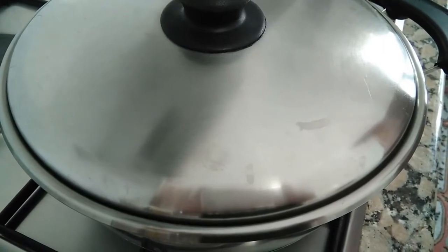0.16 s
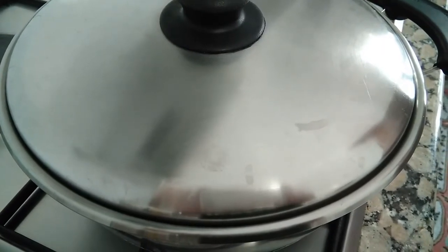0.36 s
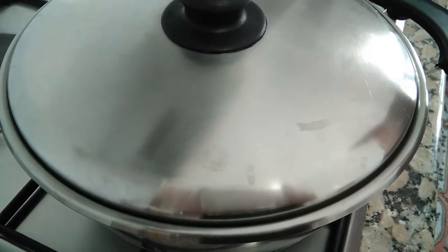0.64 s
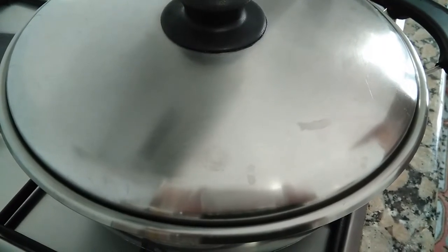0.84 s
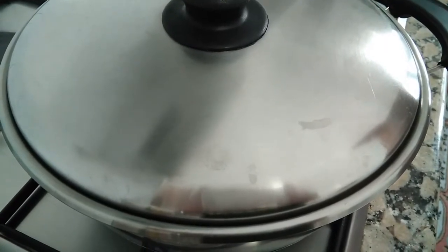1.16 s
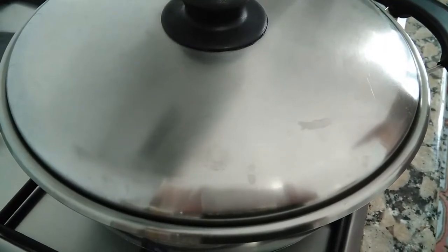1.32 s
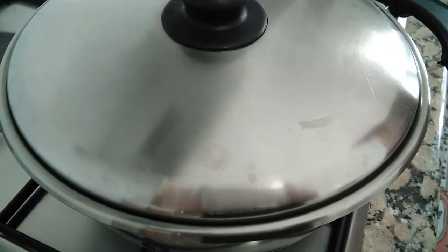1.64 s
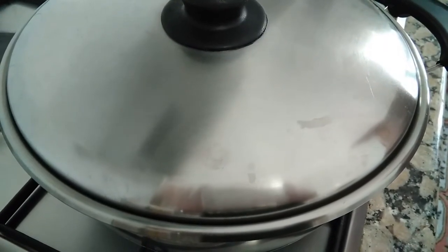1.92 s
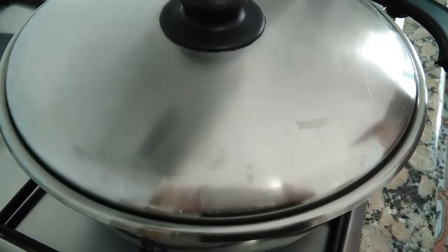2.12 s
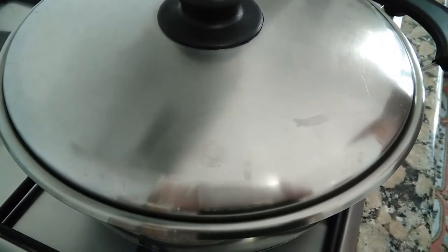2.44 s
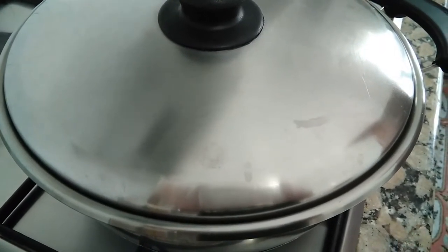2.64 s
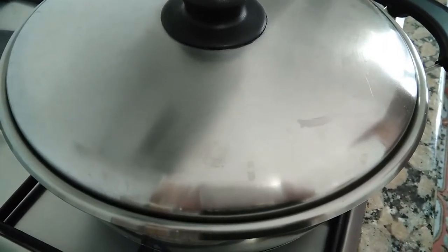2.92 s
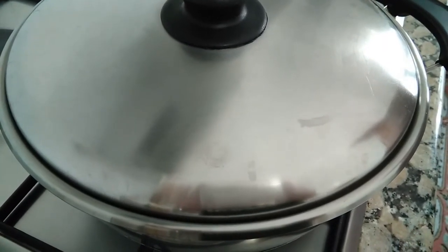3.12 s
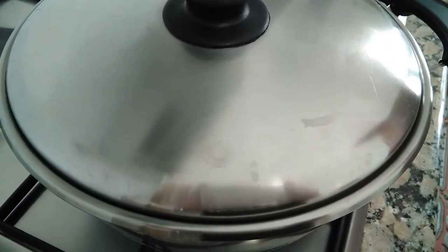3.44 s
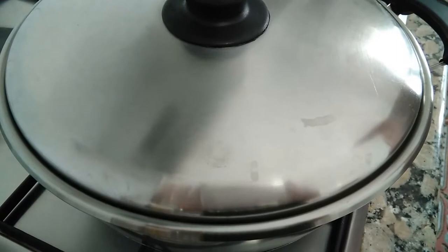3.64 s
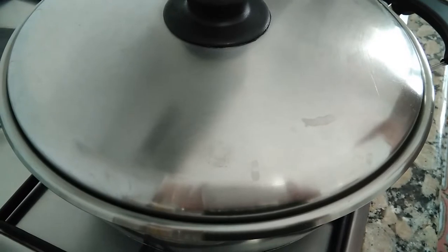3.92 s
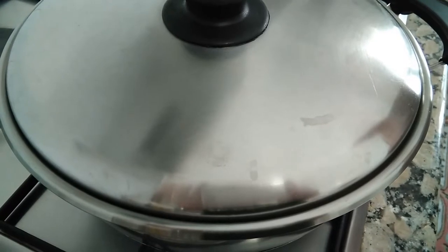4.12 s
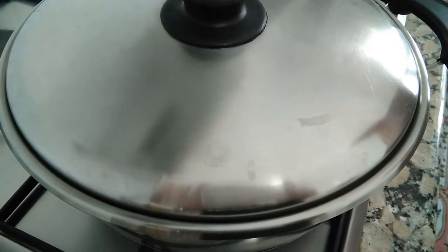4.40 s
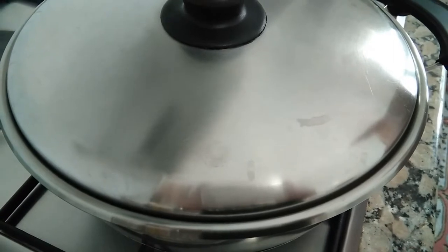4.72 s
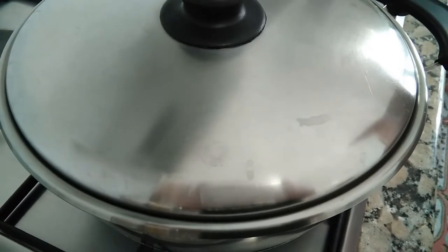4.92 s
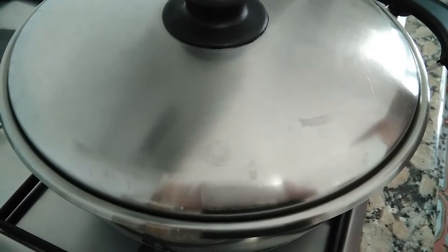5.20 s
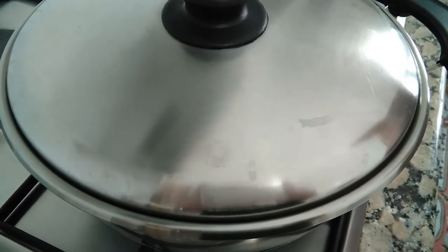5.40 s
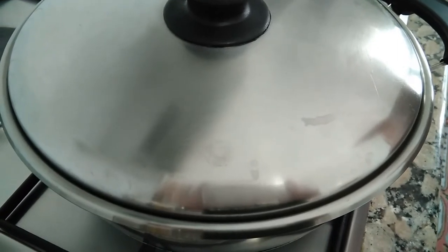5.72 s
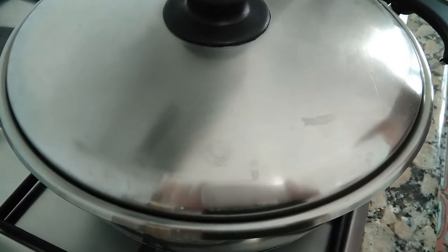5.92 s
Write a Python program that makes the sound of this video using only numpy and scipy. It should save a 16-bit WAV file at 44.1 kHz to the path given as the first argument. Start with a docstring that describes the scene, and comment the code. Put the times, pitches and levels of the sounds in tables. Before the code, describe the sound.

Popcorn bursts inside a lidded steel pot, heard close in stereo in a small hard-walled kitchen. A soft gas-flame rush with a thin, fluttering high hiss and very faint ticks of hot oil runs throughout. At 0-0.2 s a tight cluster snaps and knocks, then scattered pops follow until 1.1 s. After a gap, a crackling run fills 1.5-2.2 s with hollow steel knocks and a steam spit. Sparser pops lead to a ringing clatter near 2.9 s. From 3.2 to 4.0 s popping is steadier, with steam spurts leaning left. After a short pause, the densest, sharpest flurry comes at 4.4-4.9 s, snaps and knocks overlapping. More bursts ring the lid at 5.0-5.5 s, then a lull, and faint pops close near 5.9-6 s. Low thumps and brief room reverberation accompany them.

```python
"""Popcorn bursts in a lidded steel pot on a gas stove, close by in a small hard kitchen.
Each burst sums shaped noise (hull crack, steam, hollow body) with a low push of air and ringing steel modes.
Flying kernels knock on the wall and lid: brief noise excites the cavity, and decaying modes ring on.
Short steam spurts and faint ticks of hot oil are filtered noise and impulses.
The burner hisses underneath as coloured noise, and a decaying noise tail gives the reverberation."""
import sys
import numpy as np
from scipy import signal
from scipy.fft import rfft, irfft, next_fast_len
from scipy.io import wavfile
from scipy.ndimage import uniform_filter1d, map_coordinates

SR = 44100
rng = np.random.default_rng(int(sys.argv[2]) if len(sys.argv) > 2 else 0)


def to_wav(s):
    """Save 16-bit WAV."""
    ch = np.atleast_2d(s).T  # columns
    pcm = np.round(np.clip(ch, -1, 1) * 32767)  # PCM
    wavfile.write(sys.argv[1], SR, pcm.astype(np.int16))


N = 267246

# bursting kernels: [t/s, hollow body level/dB, steam level/dB, hull crackle level/dB, first snap peak/dB,
# thump level/dB, rise/s, spit t60/s, spit f/Hz, steam left-right level/dB]
KERNEL_BURSTS = [(0.06, -30, -23, -40, -26, -23, 0.0017, 0.06, 4460.0, -2.5),
                 (0.068, -27.5, -15.5, -40.0, -14, -35, 0.00066, 0.11, 7350, -2.5),
                 (0.114, -23.5, -24, -23.5, -5, -12, 0.0036, 0.13, 3080.0, 1.0),
                 (0.166, -51, -40, -48, -33, -33, 0.0018, 0.05, 2710.0, 6),
                 (0.392, -40, -22.0, -22.5, -27, -22.5, 0.0006, 0.077, 4420, -2.5),
                 (0.503, -37, -26, -27, -11, -28.5, 0.0021, 0.081, 8270.0, -1.0),
                 (0.561, -33.5, -33, -36.0, -26, -33, 0.00085, 0.09, 2780.0, 1),
                 (0.627, -28.0, -22, -22, -24, -30, 0.0026, 0.048, 7170.0, -1),
                 (0.846, -25.5, -18, -20, -21, -21, 0.00071, 0.11, 5560, -0.0),
                 (0.907, -43, -26, -28, -25, -18, 0.0007, 0.047, 8420.0, 6),
                 (0.927, -28.5, -26.0, -39.0, -9.5, -36, 0.00028, 0.016, 7800, -3),
                 (1.093, -48, -40.5, -53.0, -24.5, -24.5, 0.0005, 0.04, 5380.0, 1),
                 (1.489, -41, -34.5, -38, -25, -31, 0.0028, 0.074, 6650.0, -3.5),
                 (1.559, -37, -29.5, -36.5, -32.0, -30, 0.0046, 0.34, 7000, 0.5),
                 (1.621, -44, -31, -30, -38.0, -42, 0.009, 0.13, 3230, -4),
                 (1.63, -47, -36, -30, -28.0, -35, 0.0034, 0.06, 6780.0, 1.0),
                 (1.638, -30, -20.5, -21, -21.0, -42.0, 0.0012, 0.041, 6840, 4),
                 (1.738, -24, -21, -31, -10, -17, 0.00065, 0.054, 5300, 3),
                 (1.911, -34.5, -35.5, -29.5, -23, -23, 0.0021, 0.22, 2710.0, 2),
                 (2.103, -40, -33.5, -37.0, -28.0, -32, 0.0011, 0.1, 4310.0, 2),
                 (2.117, -26.5, -25.5, -25.5, -11, -37, 0.0014, 0.056, 2700, -0.5),
                 (2.238, -39, -34, -35, -27.5, -30.5, 0.00088, 0.072, 3670, -1),
                 (2.559, -33, -29.5, -17, -10.0, -26.5, 0.0012, 0.042, 7200, 6),
                 (2.834, -38, -32, -23.5, -22, -36, 0.0013, 0.077, 8480.0, -2),
                 (2.876, -33.0, -34, -36.0, -24.0, -38, 0.0014, 0.041, 2710.0, 3),
                 (2.885, -31, -39, -33, -16, -31, 0.00089, 0.04, 2710.0, 2),
                 (2.908, -31, -26, -27, -24, -40.0, 0.0034, 0.1, 8180.0, 5),
                 (3.224, -31.5, -34.5, -47, -26, -20.5, 0.00079, 0.12, 4840.0, 0.0),
                 (3.264, -28.0, -29.5, -23.5, -21, -31.5, 0.0013, 0.067, 4700, -1.5),
                 (3.366, -48.0, -50.0, -44, -34, -28.5, 0.002, 0.05, 5020.0, 2),
                 (3.475, -26.5, -23.5, -24, -8.5, -21.5, 0.0016, 0.072, 4640, 3),
                 (3.606, -47, -28.0, -43, -12, -32, 0.0013, 0.04, 6160.0, 0.0),
                 (3.691, -32.0, -19, -20.5, -26.0, -37, 0.0012, 0.091, 5800, 1),
                 (3.714, -34, -32, -21.5, -22.0, -28, 0.0029, 0.18, 7620.0, 2),
                 (3.759, -36, -39, -48.0, -36.0, -26, 0.0023, 0.11, 5040.0, -2),
                 (3.831, -27.5, -23.5, -29, -24.0, -29, 0.00023, 0.016, 5930, -1),
                 (3.898, -33, -26.5, -15.5, -21, -18.5, 0.00024, 0.076, 6180.0, 4),
                 (4.018, -30.0, -26.0, -34, -28, -21, 0.0014, 0.042, 5450.0, 2.5),
                 (4.442, -28.5, -29.5, -36, -25, -25.0, 0.00082, 0.031, 3900, 0),
                 (4.492, -29, -18.5, -24.0, 3.5, -43, 0.00096, 0.063, 7340, 2),
                 (4.505, -26.5, -28, -31.0, -22.0, -26, 0.0017, 0.081, 6960.0, 2),
                 (4.525, -42, -25, -25.0, -19.0, -18.5, 0.0029, 0.12, 4060, -0.5),
                 (4.643, -34, -25, -30.0, -22, -33, 0.001, 0.033, 4570.0, 2),
                 (4.651, -29, -22, -23.0, -3.5, -33, 0.00067, 0.0088, 4650, -3),
                 (4.667, -31.5, -46, -27, -28.0, -23, 0.0025, 0.097, 2710.0, -1.0),
                 (4.722, -33, -36, -31, -23, -18, 0.0015, 0.062, 2710.0, 2),
                 (4.739, -23, -21.5, -23.5, -15, -17, 0.0029, 0.096, 2680, 2),
                 (4.843, -34.5, -33.0, -38, -19.0, -25.0, 0.001, 0.21, 2710.0, 4.5),
                 (5.037, -29, -23.0, -18.0, -18.0, -29, 0.0012, 0.043, 4800, -1),
                 (5.065, -33, -27, -32, -14, -43, 0.0012, 0.05, 2710.0, 7),
                 (5.087, -30, -24.0, -21, -19.0, -38, 0.0023, 0.24, 5060.0, 2.5),
                 (5.115, -40, -31, -24.5, -16, -25, 0.0037, 0.12, 5300, 5),
                 (5.249, -33, -25, -30.5, -19, -34, 0.0018, 0.15, 7350, 1),
                 (5.334, -38.0, -31.5, -26, -4, -35, 0.0013, 0.0087, 6310.0, 4),
                 (5.386, -34.5, -29.5, -29, -17.0, -22, 0.0025, 0.13, 5600, 0),
                 (5.43, -48, -48, -38, -27.0, -43, 0.002, 0.081, 5120.0, 0.5),
                 (5.492, -35.5, -33.5, -35, -32.0, -28, 0.0009, 0.073, 4050, 0),
                 (5.913, -35, -35.5, -36, -35, -32.0, 0.0016, 0.037, 5040.0, -1.5),
                 (5.933, -41, -39.5, -35, -21, -40, 0.0019, 0.12, 4820.0, -0.0),
                 (5.991, -39, -38.5, -46, -27.0, -23, 0.00072, 0.27, 2710.0, -3)]
# kernels striking the steel: [t/s, knock level/dB, bright clack level/dB, ring level/dB, lid level/dB,
# struck spot f/Hz]
KERNEL_KNOCKS = [(.001, -30, -22.5, -35, -31, 1510), (0.047, -31, -32, -41, -45, 1830),
                 (.122, -23, -39, -53, -51, 540), (.134, -20.5, -32, -55, -39, 2300),
                 (.652, -22, -52, -71, -41, 1030), (.857, -29.5, -30, -43, -51, 1040),
                 (0.99, -36.5, -36, -48.5, -58, 1880), (1.118, -34, -47, -59, -60, 2320),
                 (1.616, -27, -25.5, -49, -49, 2230), (1.655, -25, -50, -46, -28, 1610),
                 (1.673, -24, -17.5, -43, -52, 1050), (1.752, -23, -54, -62, -59, 1110),
                 (1.935, -22, -33.5, -49, -36, 890), (2.173, -32.5, -61, -68, -37, 1090),
                 (2.331, -43, -60, -76, -54, 2100), (2.853, -31, -33, -44, -38, 1540),
                 (2.886, -22.5, -20.5, -48, -52, 2200), (2.899, -22, -24, -32, -30, 1510),
                 (3.241, -30, -35, -51, -24.5, 1690), (3.281, -22, -37, -66, -29, 1550),
                 (3.503, -19.5, -17, -32.5, -30.5, 1600), (3.724, -27, -41, -50, -57, 880),
                 (3.868, -30.5, -51, -51, -34, 1510), (3.914, -29, -29.5, -45, -39, 1520),
                 (4.053, -27.5, -59, -70, -58, 1000), (4.470, -25, -40, -50, -35, 1440),
                 (4.522, -25, -27, -37, -46, 1500), (4.542, -23.5, -26.5, -42, -33.5, 1530),
                 (4.681, -18.5, -25.5, -61, -54, 2160), (4.723, -27, -49, -37.5, -52, 500),
                 (4.747, -23, -50, -58, -57, 430), (4.757, -16, -45, -56, -28, 1400),
                 (4.766, -23.5, -24.5, -48, -28.5, 1660), (4.861, -35, -46, -61, -45, 1300),
                 (5.054, -20.5, -24, -46, -22.5, 1620), (5.273, -24, -54, -44, -23.5, 990),
                 (5.286, -29.5, -41, -49, -29, 1630), (5.369, -30.5, -40, -48, -36, 1640),
                 (5.426, -26, -53, -54, -57, 900), (5.524, -27.5, -51, -53, -34.5, 1160)]
# short spurts of steam: [t/s, level/dB, centre f/Hz]
STEAM_SPURTS = [(0.321, -47, 7260), (.522, -27.5, 5050), (1.470, -44.5, 8660), (1.582, -26, 5400),
                (2.074, -38.5, 5300), (3.471, -24, 4950), (3.650, -32.5, 6500), (3.681, -27.5, 5430),
                (3.82, -30, 5030), (4.626, -31, 5900), (5.266, -28.5, 5330), (5.310, -40, 7500),
                (5.480, -35, 5170)]
# modes of the pot's wall: [f/Hz, level/dB, t60/s]
WALL_MODES = [(899, -3, .4), (1044, -4, .4), (1112, -9, .4), (1184, -6, .4), (1394, -7, .6), (1542, -6, .4),
              (1647, 1, .7), (1941, -3, .5), (2159, -5, .5), (2238, -4, .6), (2498, -8, .6), (2853, -8, .5),
              (3181, -6, .6), (3350, -7, .55), (3520, -9, .4), (3650, -9, .4), (3849, 1, .5),
              (4116, -2, .45), (4312, -3, .85), (4341, -4, .5), (4486, -6, .45), (4661, -6, .4),
              (4849, -4, .7), (5076, -9, .4), (5380, -1, .6), (5609, -10, .4), (5969, -4, .6),
              (6062, -12, .5), (6557, -8, .6), (6912, -8, .35), (7203, -9, .55), (7822, -9, .45),
              (8207, -4, .38), (8479, -13, .35), (8929, -10, .33), (9664, -14, .4), (10422, -17, .42)]
# modes of the lid, around one main note: [f/Hz, level/dB, t60/s]
LID_MODES = [(897, -9, .35), (1041, -13, .35), (1181, -11, .5), (1509, -9, .3), (1659, -3, .52),
             (1667, -11, .35), (4848, -17, .45), (5968, -15, .55)]
# broad resonances of the covered pot: [f/Hz, width/Hz, level/dB]
CAVITY_RESONANCES = [(537, 100, -12), (740, 97, -6), (924.5, 59, 5), (1079, 34.7, 6), (1145, 58, -1),
                     (1489, 101, -5), (1698, 102, -7.5), (1828, 47, 0), (2148, 139, -0.5), (2900, 520, -11)]
# low modes of the kitchen in which a thump sways on: [f/Hz, level/dB, t60/s]
ROOM_MODES = [(73, -21, .3), (101.7, -16, 0.29), (117.7, -9.5, 0.34), (160, -22, .2), (209, -22.5, 0.33),
              (279, -28, .2), (297, -30, 0.17)]
# spectrum of the spitting steam: [f/Hz, level/dB]
STEAM_SPECTRUM = [(250, -22), (700, -23), (2000, -10.5), (3000, 0), (4200, 3), (5500, 5), (7400, 1),
                  (8800, -8.5), (11500, -24), (16000, -65)]
# spectrum of the cracking hull: [f/Hz, level/dB]
CRACK_SPECTRUM = [(300, -25), (1500, -11), (5000, -27), (8500, 10.5), (11300, 5.5), (13300, 12.5),
                  (15700, 14)]
# spectrum of the bright clack on steel and of the oil ticks: [f/Hz, level/dB]
CLACK_SPECTRUM = [(250, -12), (900, -6.5), (2000, 7.5), (3000, 3), (4200, 5), (5500, 3), (7400, -1.5),
                  (8800, -17), (11500, -21), (16000, -31)]
# spectrum of the steam spurts: [f/Hz, level/dB]
SPURT_SPECTRUM = [(1000, -11.5), (3000, 2.5), (4300, 3), (5500, -4.5), (7400, -2), (8300, -13),
                  (9500, -11.5), (16000, -12)]
# spectrum of the flame's rush: [f/Hz, level/dB]
FLAME_SPECTRUM = [(25, -8), (60, -5), (125, 5), (300, -8.5), (600, -4.5), (1100, -13.5), (1800, -12),
                  (3000, -16), (4200, -14.5), (5800, -20), (6600, -15.5), (8000, -23.5), (16000, -16.5)]
# noisy whistle of the gas jet: [f/Hz, width/Hz, level/dB]
NOZZLE_RESONANCES = [(4710, 190, -7), (5180, 300, 4.5), (5310, 120, 2)]
# reverberation time of the kitchen: [f/Hz, t60/s]
ROOM_DECAY = [(150, 0.43), (500, 0.52), (1400, 0.57), (4000, 0.57), (8000, 0.56), (15000, 0.32)]
# stereo microphone, what both channels share: [f/Hz, level/dB]
MID_RESPONSE = [(60, -14.5), (140, -21.5), (280, -19), (500, -7.5), (800, -2.5), (1000, -0.5),
                (16000, -1.5)]
# stereo microphone, what sets the channels apart: [f/Hz, level/dB]
SIDE_RESPONSE = [(250, 1.5), (500, -0.5), (900, -2.5), (1050, 1), (2100, -3), (2400, 2), (2800, -1)]
# stereo microphone, balance: [f/Hz, left-right level/dB]
BALANCE = [(250, 0.5), (600, 1.5), (1100, -0.5), (2000, 1.5), (4000, -5), (7500, 7.5), (12000, 2),
           (16000, -2)]

RIPPLE_DB = 3.5  # colouring by a burst's place in the pot, dB rms
TOP_HZ = 15850  # upper band limit
LEFT_LAG_S = .00063  # delay of the bursts' left channel
POP_RING_DB = -29.5  # ring of the steel against the pop that wakes it
THUD_DB = -16  # thud of the pot's hollow against the push that wakes it
PUSH_HZ, PUSH_WIDTH_S, PUSH_PEAK_S = 119, 0.0039, 0.0072  # push of air: pitch, half width, time to its peak
RETURN_S, RETURN_DB = 0.032, -15  # the walls send the push back once
LINGER_DB, LINGER_T60_S = -11.5, 0.17  # slow decay of every burst inside the pot, against its start
TICKS_PER_S, TICK_DB = 24, -49  # ticks of hot oil: mean rate, median level


def pops():
    """Sudden release of pressure: the hull snaps and crackles, steam spits, and cavity and steel respond."""
    s, body_db, steam_db, crack_db, snap_db, _, rise, spit_s, spit_hz, pan_db = np.transpose(KERNEL_BURSTS)
    jet = favouring(colour(STEAM_SPECTRUM), spit_hz, width_share=0.07, boost_db=-9)
    hull_colour = colour(CRACK_SPECTRUM)
    body = bursts(resonances(CAVITY_RESONANCES), rise, t60=1.3 * spit_s, grain_db=0.5,
                  ripple_db=RIPPLE_DB, memory=0.0033, alike=0.7)
    steam = bursts(jet, rise, t60=spit_s, grain_db=2.0, ripple_db=RIPPLE_DB, memory=0.0021, alike=0.021)
    crack = bursts(hull_colour, rise, t60=.7 * spit_s, grain_db=2.5,
                   ripple_db=RIPPLE_DB, memory=0.000094, alike=0.14)
    snap = bursts(hull_colour, 0 * rise, t60=.005, grain_db=8, ripple_db=2, memory=.0001, alike=.6)
    snap /= np.abs(snap).max(axis=(1, 2), keepdims=True)  # snaps are set by their peak
    track = np.zeros((2, N))
    for i in range(len(s)):
        sides = amp(np.array([[.5], [-.5]]) * pan_db[i])
        hull = amp(crack_db[i]) * crack[i] + amp(snap_db[i]) * snap[i]
        add(track, s[i], amp(body_db[i]) * body[i] + sides * amp(steam_db[i]) * steam[i] + hull)
    return track + steel(WALL_MODES, s, np.maximum(body_db, steam_db) + POP_RING_DB)


def thumps():
    """Volume displacement: a swelling kernel pushes the air, which sways on in room modes, sides in antiphase."""
    t = np.arange(SR // 2) / SR
    sides = np.array([[.5], [-1.5]])

    def packet(u):
        return np.exp(-.5 * (u / PUSH_WIDTH_S) ** 2) * np.cos(2 * np.pi * PUSH_HZ * u)

    track = np.zeros((2, N))
    for s, _, _, _, _, db, *_ in KERNEL_BURSTS:
        stretch = 1 + .01 * rng.standard_normal()  # slight spread of tempo and pitch
        u = (t - 2 * PUSH_PEAK_S) * stretch
        late = np.maximum(u, 0)
        sway = 0
        for hz, level, t60 in ROOM_MODES:
            strength = amp(level + rng.normal(0, 1.6))
            sway = sway + strength * np.cos(2 * np.pi * hz * late) * fade(late, t60)
        push = packet(u) + amp(RETURN_DB) * packet(u - RETURN_S) + (1 - fade(late, 0.12)) * sway
        add(track, s - PUSH_PEAK_S, amp(db) * push * sides)
    return track


def thuds():
    """Cavity resonance: the pushes of air also wake the hollow of the pot."""
    hollow = resonances([(224, 185, -6), (374, 300, -4.5), (480, 207, -4), (604, 29, -7.5)])
    booms = bursts(hollow, np.full(len(KERNEL_BURSTS), .003), t60=0.051, grain_db=-0.5,
                   ripple_db=RIPPLE_DB, memory=0.0021, alike=0.78)
    track = np.zeros((2, N))
    for (s, _, _, _, _, db, *_), boom in zip(KERNEL_BURSTS, booms):
        add(track, s, amp(db + THUD_DB) * boom)
    return track


def knocks():
    """Impact excitation: a kernel gives a hollow knock favouring the struck spot, a clack and a modal ring."""
    s, knock_db, clack_db, ring_db, lid_db, spot_hz = np.transpose(KERNEL_KNOCKS)
    contact = np.zeros(len(s))  # immediate onset
    hollow = favouring(resonances(CAVITY_RESONANCES), spot_hz, width_share=.2, boost_db=1)
    knock = bursts(hollow, contact, t60=0.051, grain_db=5.5,
                   ripple_db=RIPPLE_DB, memory=0.0018, alike=0.61, strike_db=0.5)
    clack = bursts(colour(CLACK_SPECTRUM), contact, t60=0.068, grain_db=3.0,
                   ripple_db=2.5, memory=0.0077, alike=0.09, strike_db=-11)
    track = np.zeros((2, N))
    for i in range(len(s)):
        add(track, s[i], amp(knock_db[i]) * knock[i] + amp(clack_db[i]) * clack[i])
    wall = steel(WALL_MODES, s, ring_db)
    lid = steel(LID_MODES, s, lid_db, spread_db=1)
    return track + wall + lid


def spurts():
    """Jet noise: steam squirts out in short hisses, to the left, each pitched by the size of its crack."""
    s, level_db, centre_hz = np.transpose(STEAM_SPURTS)
    jet = favouring(colour(SPURT_SPECTRUM), centre_hz, width_share=0.16, boost_db=6.5)
    hisses = bursts(jet, np.full(len(s), .006), t60=0.1, grain_db=1.5,
                    ripple_db=RIPPLE_DB, memory=0.0017, alike=0.069)
    track = np.zeros((2, N))
    for start, db, hiss in zip(s, level_db, hisses):
        add(track, start, amp(db) * hiss)
    return track * amp([[1.5], [-3]])


def sizzle():
    """Random impulse train: hot oil ticks faintly, each tick coloured like a clack."""
    moments = rng.random(N) < TICKS_PER_S / SR
    spread_db = 5 * rng.standard_normal((2, N)).clip(-2, 1.5)
    return filtered(moments * amp(TICK_DB + spread_db), colour(CLACK_SPECTRUM))


def burner():
    """Turbulent noise: the flame's soft, flickering rush and the narrow, fluttering hiss of its gas jet."""
    flame = unit(filtered(rng.standard_normal((2, N)), colour(FLAME_SPECTRUM)))
    tilt = [(3000, 5), (4400, 17), (5300, 7.5), (5800, -4)]  # f/Hz, level/dB
    jet = filtered(rng.standard_normal((2, N)),
                   lambda hz: resonances(NOZZLE_RESONANCES)(hz) * amp(along(tilt, hz)))
    knots = rng.standard_normal(N * 25 // SR + 4)  # about 25 random levels a second, joined smoothly
    flutter = amp(0.85 * map_coordinates(knots, [np.linspace(0, len(knots) - 1, N)]))
    # the flame reads the first third backwards, so it varies more slowly
    flicker = amp(0.63 * map_coordinates(knots, [np.linspace(len(knots) // 3, 0, N)]))
    return amp(-50.0) * flicker * flame + amp(-49.5) * flutter * unit(jet)


def kitchen(x, wet):
    """Diffuse reverberation: a noise tail decays at each frequency's own rate; wet lists its f/Hz, level/dB."""
    hz, t, z = signal.stft(rng.standard_normal((2, SR)), SR, nperseg=256)
    tail = signal.istft(z * fade(t, along(ROOM_DECAY, hz)[:, None]), SR, nperseg=256)[1]
    tail *= 1 - fade(np.arange(tail.shape[1]) / SR, 0.014)  # the first walls take a few ms to answer
    tail = filtered(tail / np.linalg.norm(tail[0]), colour(wet))
    crossed = 0.57 * x + 0.32 * x[::-1]  # each side also hears the other
    return signal.fftconvolve(crossed, tail, axes=1)[:, :N]


def scene():
    """Superposition of the pot, its reverberation, the thumps and the burner."""
    pot = pops() + knocks() + spurts() + thuds() + sizzle()
    room = kitchen(pot, wet=[(200, 5.5), (1200, -4.0), (4500, -3.5), (8000, -5.0), (14000, -7.0)])
    return pot + room + thumps() + burner()


def record(dry):
    """Mid-side reception: shared bass is cut, the balance leans by frequency and the band is limited."""
    mid = filtered(dry.mean(0), colour(MID_RESPONSE))
    side = filtered((dry[0] - dry[1]) / 2, lambda hz: amp(along(SIDE_RESPONSE, hz)))

    def microphone(hz):
        lean = amp(along(BALANCE, hz) * np.array([[.5], [-.5]]))
        return lean / np.sqrt(1 + (hz / TOP_HZ) ** 200)

    return filtered(np.array([mid + side, mid - side]), microphone)


def bursts(response, rise, t60, grain_db, ripple_db, memory, alike, strike_db=-60):
    """Filtered transient noise: one stereo grainy burst per rise/s, led by a strike, rms 1 over 10 ms."""
    t = np.arange(SR // 6) / SR
    own, common, rough, paths = rng.standard_normal((4, len(rise), len(t)))
    # alike is the correlation of the two channels' noise
    noise = np.stack([alike * common + np.sqrt(1 - alike ** 2) * own, common], axis=1)
    grain = amp(grain_db * unit(uniform_filter1d(rough, size=24)))
    swell = np.minimum(t / np.maximum(rise, 1 / SR)[:, None], 1) ** 2
    # each spot in the pot has its own short echoes, lasting about memory seconds, which give it its own peaks
    echoes = paths * t * np.exp(-t / memory)
    echoes *= np.log(amp(ripple_db)) * np.sqrt(2) / np.linalg.norm(echoes, axis=1, keepdims=True)

    def placed(hz):
        spot = np.exp(rfft(echoes, 2 * len(hz) - 2))[:, None]
        lag = np.exp(-2j * np.pi * hz * LEFT_LAG_S * np.array([[1], [0]]))
        return response(hz) * spot * lag

    direct = grain * fade(t, np.reshape(t60, (-1, 1)))
    linger = amp(LINGER_DB) * np.sqrt(grain) * fade(t, LINGER_T60_S)
    drive = noise * (swell * (direct + linger))[:, None]
    drive[..., 0] += amp(strike_db) * np.linalg.norm(drive, axis=2)  # one clean impulse
    x = filtered(drive, placed)
    return x / np.sqrt(np.mean(x[..., :SR // 100] ** 2, axis=(1, 2), keepdims=True))


def steel(modes, times, levels_db, spread_db=3.5):
    """Modal vibration: each blow rings the modes at new strengths, different on each side of the pot."""
    t = np.arange(SR * 4 // 5) / SR
    hz, db, t60 = np.transpose(modes)[:, :, None]
    decay = amp(db) * fade(t, t60) * (1 - fade(t, 0.00014))
    twin_hz = hz * (1 + .003 * hz / 2000)  # nearly round steel splits each mode into a close pair
    sines = decay * np.sin(2 * np.pi * hz * t)
    cosines = decay * np.cos(2 * np.pi * hz * t)
    twins = .5 * decay * np.sin(2 * np.pi * twin_hz * t)
    waves = np.vstack([sines, cosines, twins])
    track = np.zeros((2, N))
    for s, level in zip(times, levels_db):
        phase = 2 * np.pi * rng.random((2, len(hz)))
        strength = amp(level + spread_db * rng.standard_normal(len(hz)))
        twin_part = rng.standard_normal(phase.shape)
        weights = strength * np.array([np.cos(phase), np.sin(phase), twin_part])
        add(track, s, np.hstack(weights) @ waves)
    return track


def favouring(response, centres_hz, width_share, boost_db):
    """Selective resonance: one response for each event, lifted around that event's own frequency."""
    c = centres_hz[:, None, None]
    return lambda f: response(f) * (0.5 + resonances([(c, width_share * c, boost_db)])(f))


def resonances(modes):
    """Driven damped oscillators: causal response of (f/Hz, width/Hz, level/dB), with alternating signs."""
    def response(f):
        total = 0
        for k, (c, w, db) in enumerate(modes):
            total = total + (-1) ** k * amp(db) * 1j * f * w / (c * c - f * f + 1j * f * w)
        return total
    return response


def colour(points):
    """Minimum phase: the causal response with the given (f/Hz, level/dB) spectrum, by folding its cepstrum."""
    def response(hz):
        cepstrum = irfft(np.log(amp(along(points, hz))))
        half = len(cepstrum) // 2
        return np.exp(rfft(cepstrum * np.r_[1, np.full(half - 1, 2), np.zeros(half)]))
    return response


def filtered(x, response):
    """Linear filtering: x times a complex response of frequency."""
    n = x.shape[-1]
    m = 2 * next_fast_len(n // 2 + 2048)
    return irfft(rfft(x, m) * response(np.fft.rfftfreq(m, 1 / SR)), m)[..., :n]


def along(points, hz):
    """Logarithmic frequency scale: (f/Hz, value) points interpolated on it."""
    f, v = np.transpose(points)
    return np.interp(np.log(hz + 1), np.log(f + 1), v)


def fade(t, t60):
    """Exponential decay by 60 dB in t60."""
    return np.exp(-np.log(1000) * t / t60)


def amp(db):
    """Level scale: decibels to amplitude gain."""
    return 10 ** (np.asarray(db) / 20)


def unit(x):
    """Normalisation to rms 1."""
    return x / np.sqrt(np.mean(x ** 2) + 1e-20)


def add(track, s, sound):
    """Superposition: mix a stereo sound into the track at time s."""
    part = track[:, max(0, round(s * SR)):][:, :sound.shape[-1]]
    part += sound[:, :part.shape[-1]]


dry = scene()
out = record(dry)
to_wav(out)
```